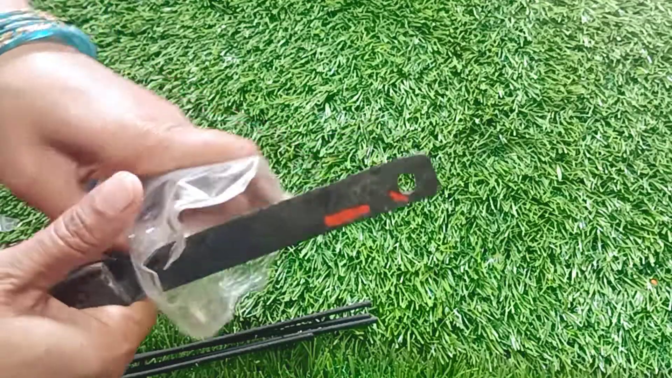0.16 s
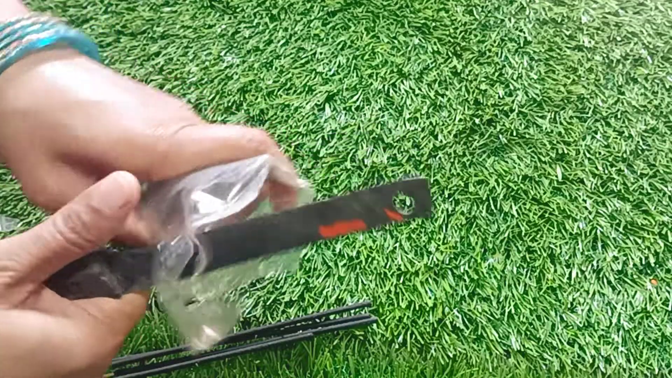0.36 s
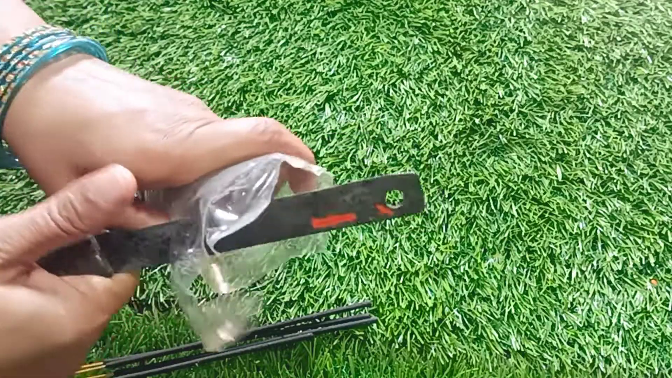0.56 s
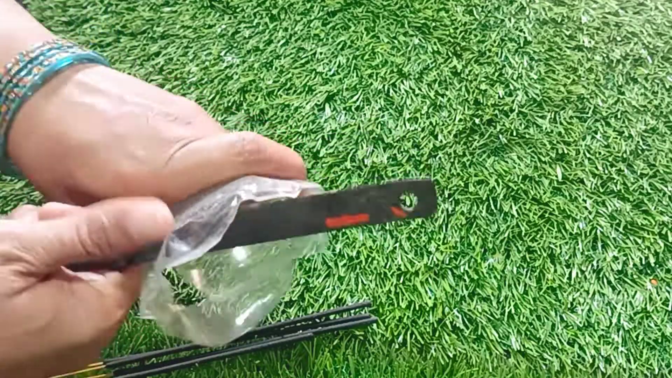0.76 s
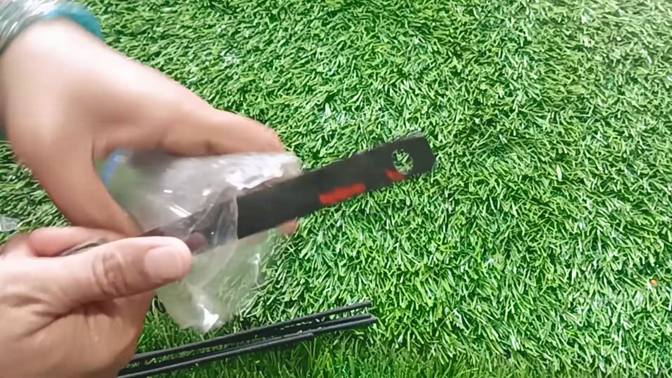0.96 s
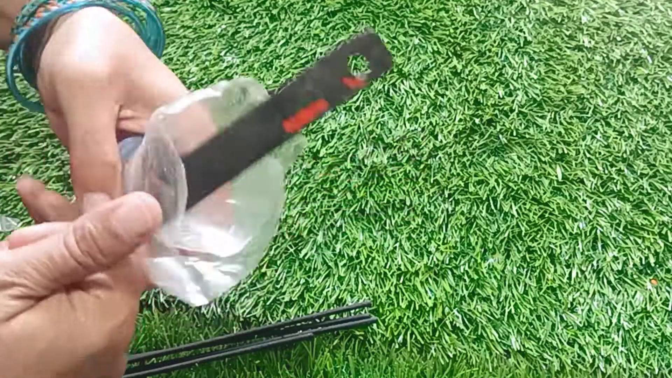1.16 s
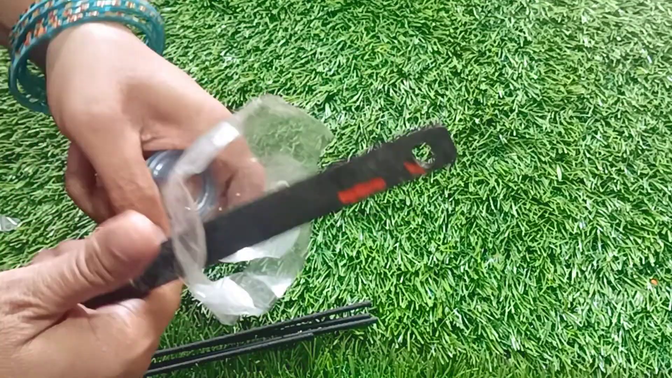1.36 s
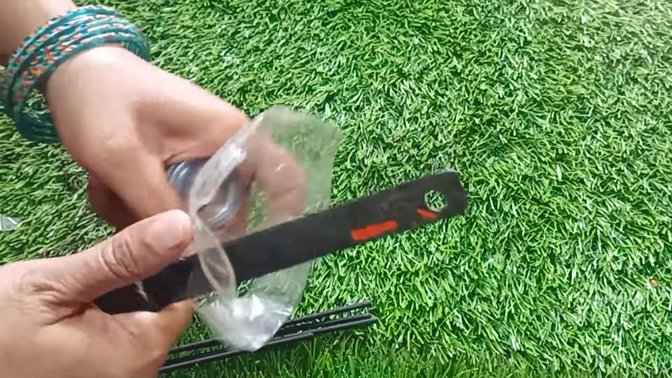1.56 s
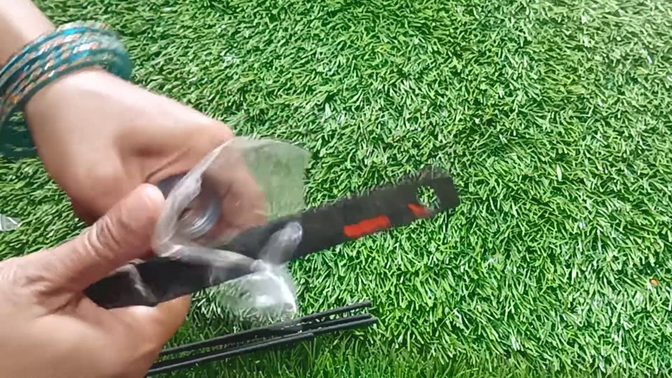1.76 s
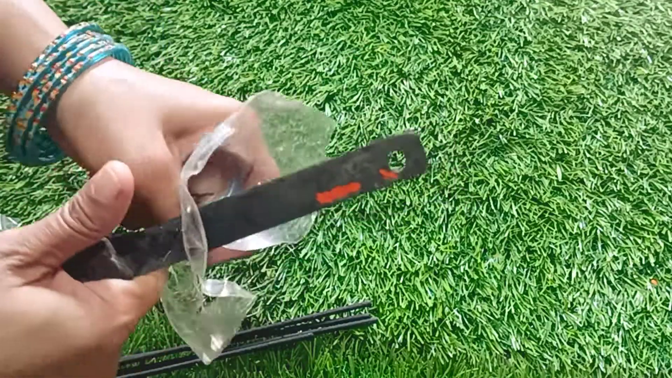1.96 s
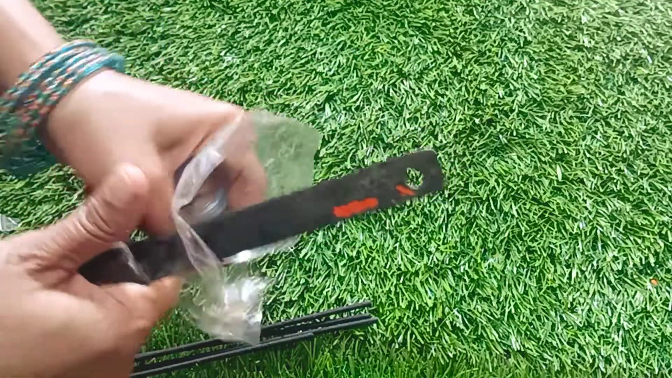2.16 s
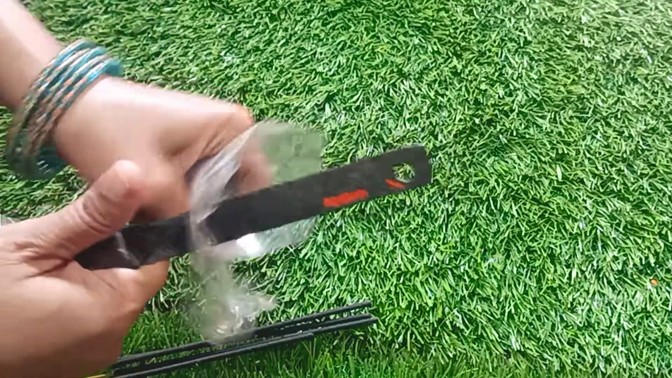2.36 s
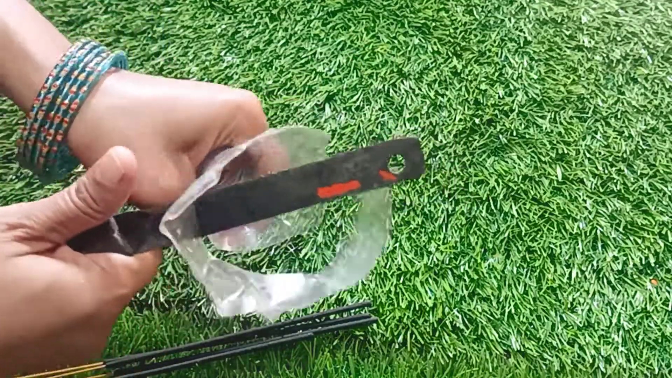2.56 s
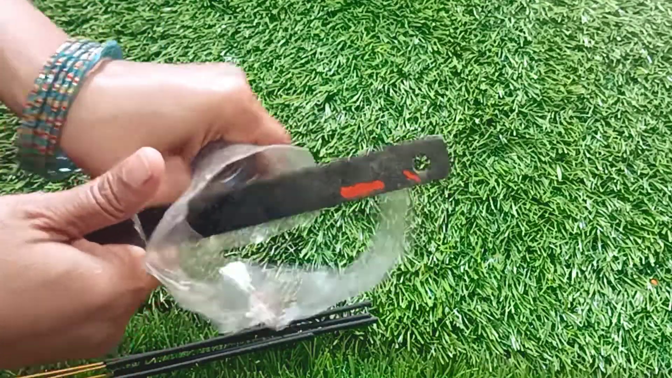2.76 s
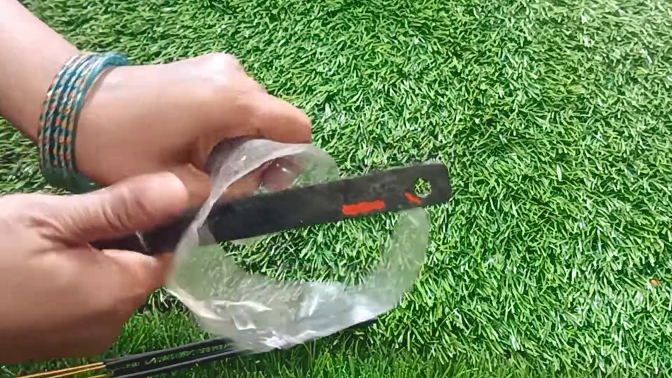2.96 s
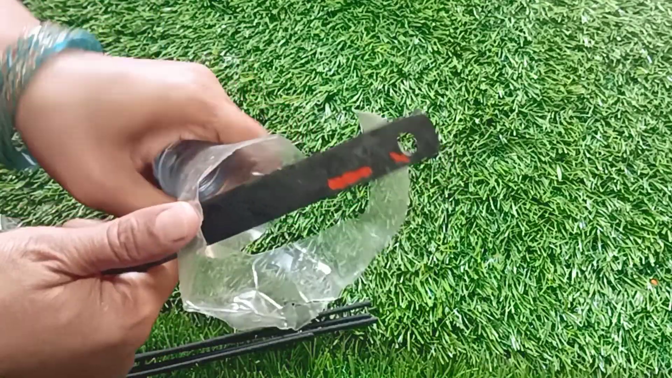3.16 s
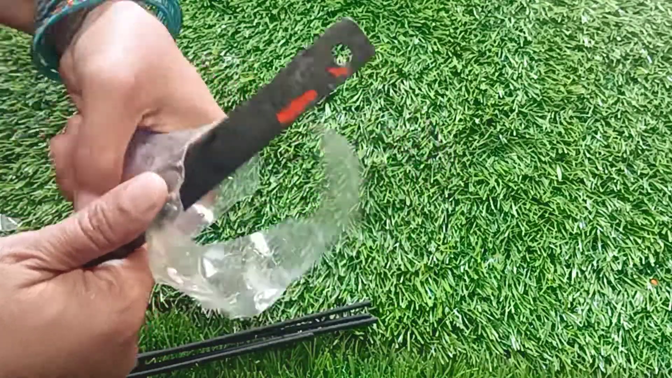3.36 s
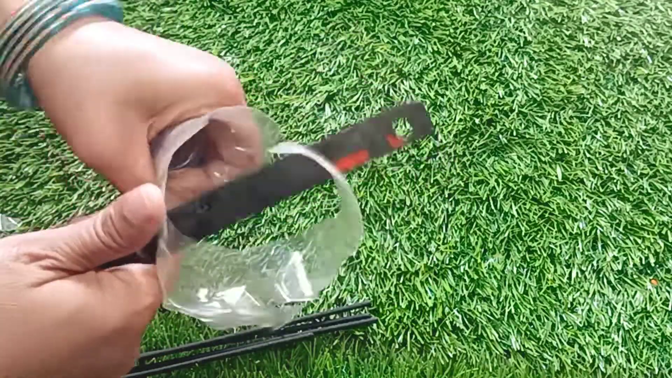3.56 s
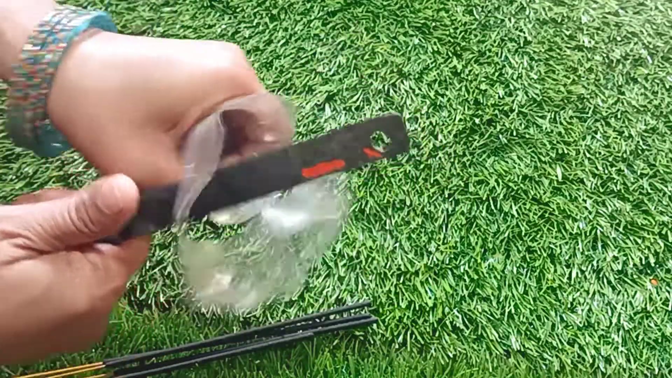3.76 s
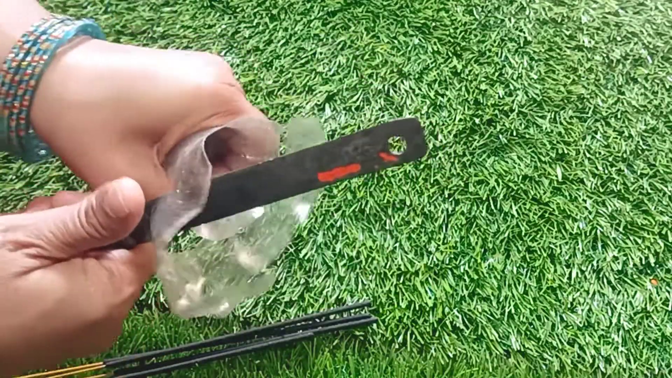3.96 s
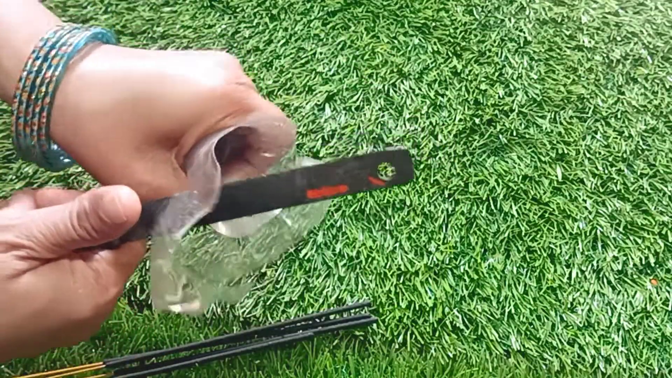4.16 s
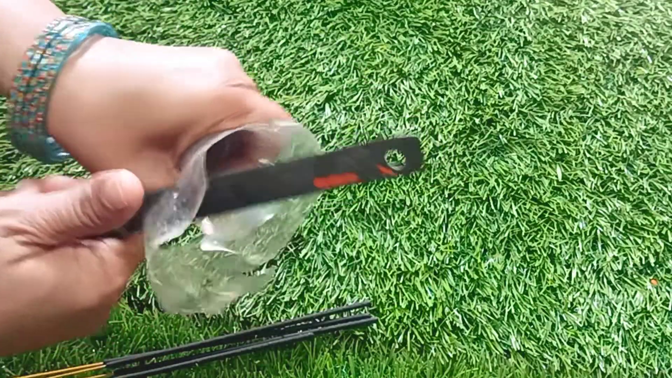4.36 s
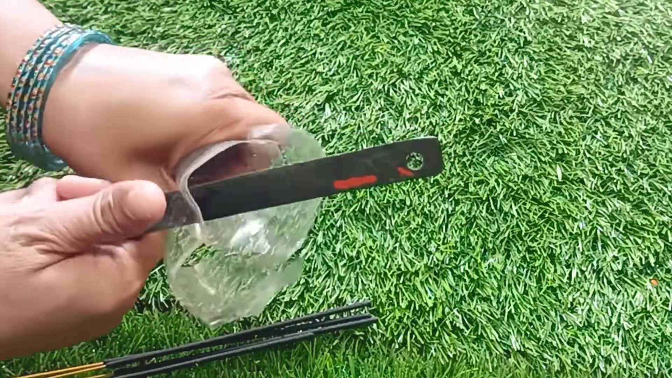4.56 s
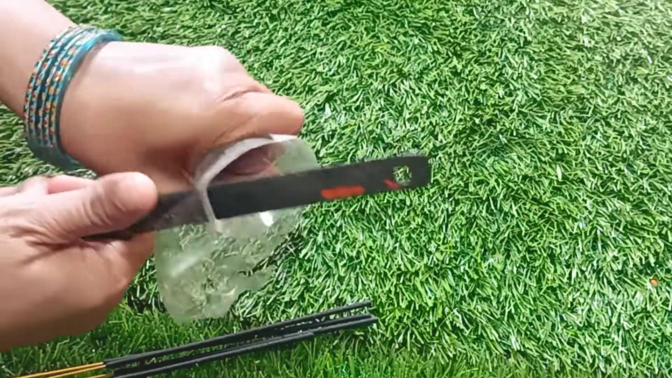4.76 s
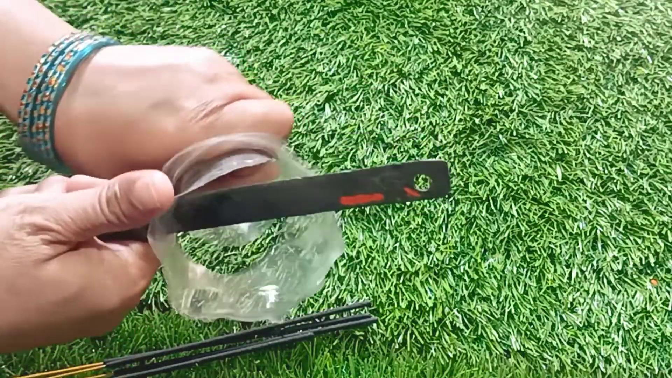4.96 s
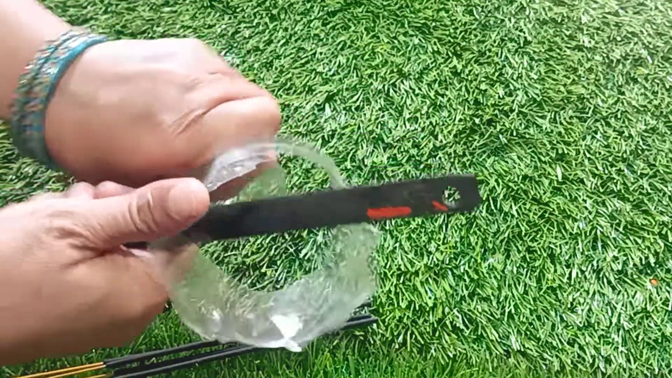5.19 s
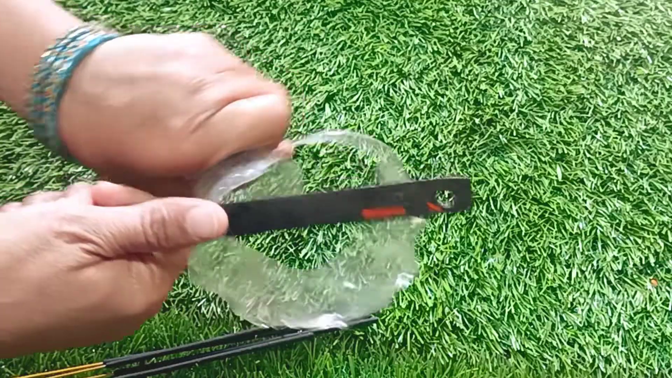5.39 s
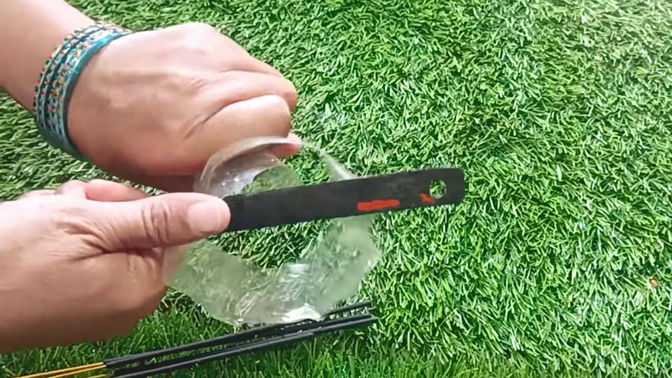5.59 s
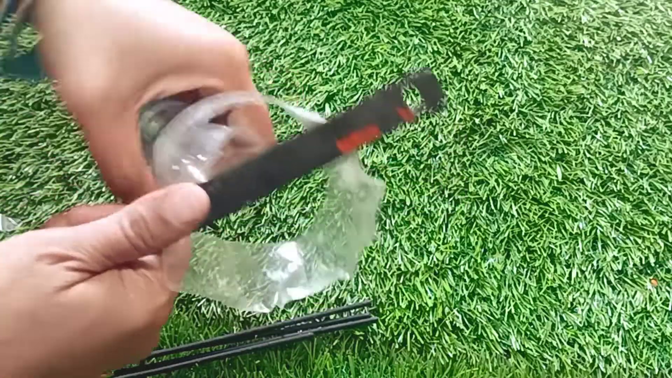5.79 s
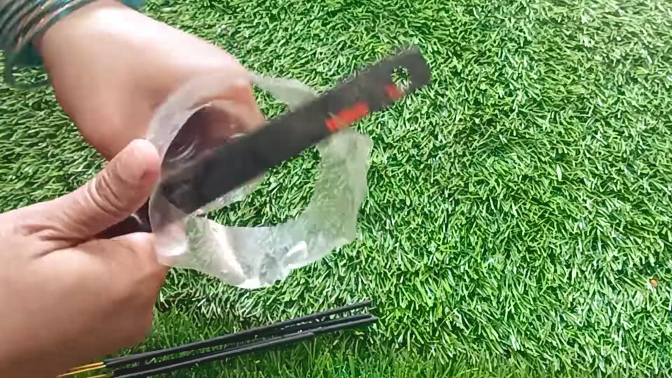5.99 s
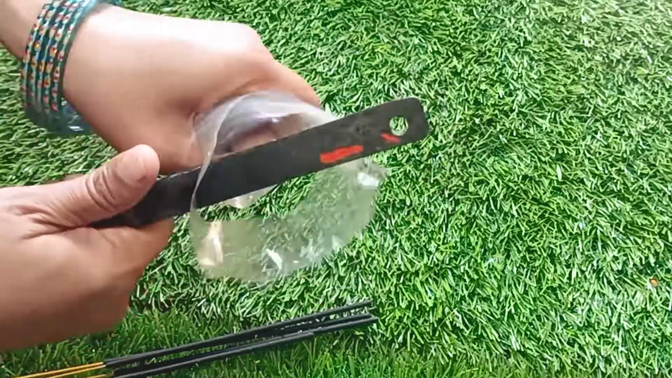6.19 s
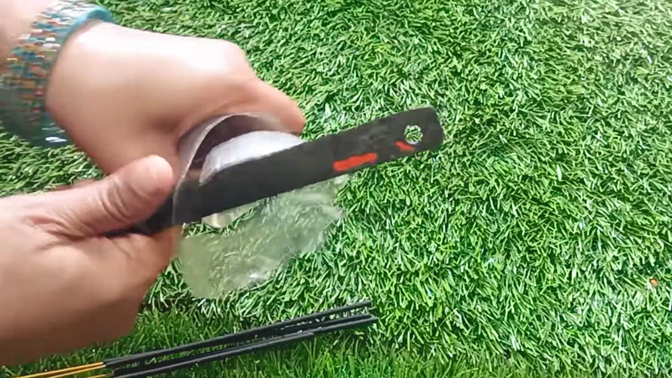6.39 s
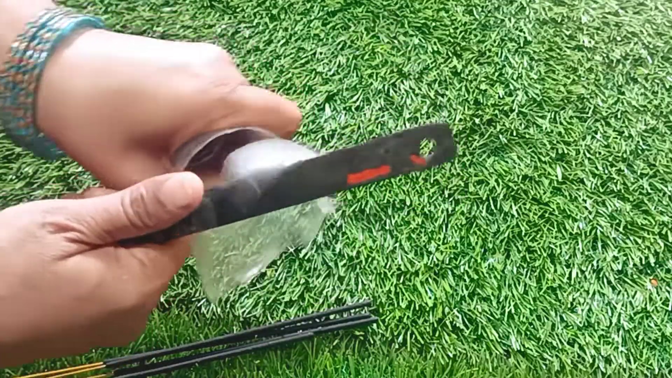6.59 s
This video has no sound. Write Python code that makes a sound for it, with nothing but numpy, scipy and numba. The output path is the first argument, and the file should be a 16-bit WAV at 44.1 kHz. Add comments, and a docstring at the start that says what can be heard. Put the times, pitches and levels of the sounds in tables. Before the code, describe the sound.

A small saw blade rasps back and forth through a thin plastic bottle wall, scratchy crackling strokes with sharp snaps and quieter gaps.

```python
"""A dense crackle swells and dies in strokes: a saw blade works back and forth through a thin plastic bottle wall.
Its teeth catch and slip; louder snaps come as the wall buckles or a tooth tears free. Both ring the same wall modes.
Late on, the cut edge gives a short run of squeaks: noise through one narrow, wavering mode.
Glass bangles chink faintly as decaying sines. Behind lie a short noise-tail reverb, a low hush and a faint rumble."""
import sys
import numpy as np
from scipy import signal
from scipy.fft import rfft, irfft
from scipy.io import wavfile
from scipy.ndimage import uniform_filter1d
from numba import njit

SR = 44100
rng = np.random.default_rng(int(sys.argv[2]) if len(sys.argv) > 2 else 0)


def file_out(sig):
    """Save sig as 16-bit WAV at sys.argv[1]."""
    # one column per channel
    cols = np.atleast_2d(sig).T
    # limit, then scale
    lim = np.clip(cols, -1, 1)
    pcm = np.round(lim * 32767).astype(np.int16)
    wavfile.write(sys.argv[1], SR, pcm)


N = 292383


def undb(db):
    """Amplitude ratio of a level in dB."""
    return 10 ** (np.asarray(db) / 20)


def rms(x):
    """Root mean square level."""
    return np.sqrt(np.mean(x ** 2))


def band(x, edges_hz):
    """Second-order Butterworth band-pass."""
    return signal.sosfilt(signal.butter(2, edges_hz, "band", fs=SR, output="sos"), x)


def walk(rate_hz):
    """Random levels held 1 / rate_hz s and smoothed twice; spread near 1."""
    hold = int(SR / rate_hz)
    steps = np.repeat(rng.standard_normal(N // hold + 1), hold)
    smooth = uniform_filter1d(uniform_filter1d(steps, hold), hold)
    return 1.414 * smooth[:N]


@njit
def ring(x, pole):
    """One decaying mode whose complex pole may change every sample."""
    y, z = np.empty(len(x)), 0j
    for i in range(len(x)):
        z = z * pole[i] + x[i] + 1e-18
        y[i] = z.imag
    return y


def pole_of(hz, t60_s):
    """Pole of a mode with that pitch and 60 dB decay time."""
    return np.exp(2j * np.pi * hz / SR - np.log(1000) / (t60_s * SR))


# Modes of the plastic wall, in four groups from body to top. Each row: pitch in Hz, relative level in dB,
# nominal t60 in s (wall() scales it).
BODY_MODES = [(158, -24, 0.069), (242.4, -18.5, 0.043), (302.3, -15, 0.024), (421, -1.5, 0.068),
              (502, -1, 0.033), (602.3, 4, 0.089), (766, 16, 0.034), (876, 13, 0.026)]
WALL_MODES = [(1330, -16.5, 0.068), (1472, -3.5, 0.069), (1595, -6.5, 0.09), (1751, -4.5, 0.065),
              (1902, 3.5, 0.036), (2073.5, -0.5, 0.038), (2156, -8, 0.065), (2436, 1.5, 0.019),
              (2694, 6.5, 0.014), (3095, -6.5, 0.044), (3230, -26.5, 0.0092)]
TREBLE_MODES = [(3350, -3.5, 0.0033), (4080, -1.5, 0.0063), (4830, -6, 0.02), (5610, -3.5, 0.0056),
                (5926, -5, 0.017), (6666, -5.5, 0.018), (7150, -9, 0.013)]
TOP_MODES = [(9000, 8, 0.0062), (8920, 1, 0.014), (9900, 5.5, 0.0078), (10900, -12.5, 0.0033),
             (12800, -18, .003), (15100, 2, .004)]
# Bands radiated by the wall, body, treble and top modes, in that order. Each row: low edge in Hz, high edge in Hz.
RADIATED_BANDS = [(946, 3180), (151, 940), (3300, 6980), (7240, 21000)]


def wall(modes, edges_hz, at, size, scatter_db, bend, t60_scale=1.1):
    """Blows ring a group of modes: each lands elsewhere, and the changing grip shifts mode levels and pitches."""
    place = rng.standard_normal((len(at), len(modes) + 1))
    polarity = np.sign(place[:, -1])
    out = 0
    for k, (hz, db, t60_s) in enumerate(modes):
        blows = size * polarity * undb(db + scatter_db * place[:, k])
        push = np.bincount(at, blows, N) * undb(1.37 * walk(8))
        pitch_hz = hz * (1 + bend * walk(30))
        out = out + ring(push, pole_of(pitch_hz, t60_s * t60_scale))
    return band(out, edges_hz) / np.sum(undb(np.array(modes)[:, 1]))


RASP_TOP_DB = -15  # highest level of the rasp in dB, before its shares
SLIPS_PER_S = 2200
TEETH_PER_S, TOOTH_FADE_DB = 100, 4.5  # the tooth rate wanders around this
# Blade strokes and lighter rubs between them. Each row: time of full level in s, hold in s, level in dB before
# the RASP_TOP_DB cap, rise in dB per s, nominal fall in dB per s, then relative shares in dB of rumble, low body,
# body, upper wall, treble, top and hollow ring, last the hollow ring pitch in Hz.
BLADE_STROKES = [(0.003, 0.0037, -14, 3060.0, 310, -33, -24, -13, -8, -19, -34.5, -15, 732),
                 (0.169, 0.036, -24.5, 820.0, 328, -48, -16, -12.5, -12, -19.5, -34, -16, 785),
                 (0.303, 0.034, -20.5, 293, 380.0, -57, -26, -12, -15, -20, -35.5, -19, 240),
                 (0.423, 0.056, -23.5, 1960.0, 271.5, -48, -30.5, -17.5, -28, -21.5, -40.5, -23, 759),
                 (0.565, 0.052, -22, 390.0, 260.0, -45, -19.5, -10.5, -18, -16, -33, -10, 580),
                 (0.694, 0, -22, 616, 130.0, -45, -28.5, -19, -12, -17, -37, -16, 752),
                 (0.84, 0.012, -27.5, 150.0, 201, -29.5, -27, -10, -6.5, -16.5, -37.5, -15, 558),
                 (0.954, 0.002, -41.5, 510.0, 512, -45, -37, -10, -1, -14, -35, -18, 740),
                 (0.999, 0.012, -42.5, 632, 450.0, -36, -36, -13.5, -2, -3.5, -39, -11, 861),
                 (1.063, 0.0, -47.5, 570.0, 220.0, -37, -32, -12, -7, -17, -31, -23, 415),
                 (1.1, 0.029, -61.5, 400, 400, -16, -20, 4, -14, -19, -30, 4, 430),
                 (1.179, 0, -47.5, 1734, 342, -35, -31, -17, 0, -23, -15, -20, 762),
                 (1.208, 0.03, -65.5, 500, 300, -26, -20, 5, -8, -21, -31, 3, 600),
                 (1.248, 0.047, -49, 968, 1040.0, -35, -28, -22, -12, -33, -41, -15, 614),
                 (1.317, 0.041, -41.5, 2673, 710.0, -44, -36, -17, -5.5, -11, -28, -32, 849),
                 (1.429, 0, -42.5, 404, 612, -39, -28, -18, -18, -28, -41, -26, 845),
                 (1.487, 0, -39.5, 4004, 869, -35, -31, -13.5, -14, -26, -41, -13, 767),
                 (1.576, 0.0073, -50, 1911, 710.0, -30, -13, -13, -19, -26, -45, -25, 326),
                 (1.637, 0.038, -26.5, 3721, 400.0, -54, -28, -27, -14, -15, -32, -26, 626),
                 (1.75, 0.031, -44, 288, 163.5, -32, -27, -15, -17, -14, -35, -20, 748),
                 (1.83, 0.03, -23.5, 2732, 560.0, -59, -44, -28, -8.5, -22, -35, -20, 675),
                 (1.934, 0.011, -38, 1422, 630.0, -32, -26, -36, -3.5, -19, -37, -39, 830),
                 (2.032, 0, -23.5, 564, 375, -41, -20, -11, -9, -27, -37, -20, 777),
                 (2.11, 0.03, -56.5, 500, 392, -36, -12, -1, 1, -26, -32, 1, 415),
                 (2.159, 0.011, -16.5, 2030.0, 399, -64, -32, -16, -14.5, -26.5, -34.5, -18.5, 759),
                 (2.298, 0.051, -21, 417, 389, -26.5, -12, -10.5, -12.5, -16, -30, -22, 785),
                 (2.464, 0.0, -19.5, 368, 250.0, -40, -24, -7, -5, -16.5, -28, -23, 817),
                 (2.583, 0.064, -28, 1240.0, 337, -38, -15.5, -12.5, -4, -12.5, -23, -17.5, 750),
                 (2.72, 0.053, -31.5, 630.0, 235, -44, -21, -14.5, -8, -10, -26.5, -16.5, 527),
                 (2.865, 0.0, -22.5, 1040.0, 214, -40, -8.5, -2.5, -4, -14, -27, -18, 727),
                 (2.96, 0, -29, 3996, 705, -52, -19.5, -9, -9, -11, -13, -8.5, 420),
                 (3.003, 0.018, -48, 1130.0, 420.0, -58, -33, -15, -3, -4, -17, -22, 450),
                 (3.074, 0.0018, -33, 1200.0, 433, -51, -20, 1.5, -16, -16, -20, 3, 484),
                 (3.11, 0.034, -35.5, 155, 345, -50, -25, -10, -4.5, -8, -24.5, -17.5, 488),
                 (3.334, 0, -39.5, 420.0, 520.5, -38, -25, -22, -8, -12, -33, -21, 924),
                 (3.458, 0.038, -55, 223, 631, -27, -24.5, -18, -7, -23, -35, -14, 803),
                 (3.542, 0.0076, -29.5, 3194, 249, -46, -29, -5, -4, -6, -20.5, -26, 760),
                 (3.698, 0.03, -55, 504, 300, -25, -4, 4, -7, -24, -35, 4, 463),
                 (3.782, 0.024, -28.5, 300.0, 450.0, -36, -5, -5, -12, -19.5, -30, -9.5, 386),
                 (3.833, 0.052, -21.5, 660.0, 417, -44, -19, -8.5, -13, -16.5, -29, -22, 748),
                 (3.973, 0.029, -22.5, 370.0, 406, -52, -19, -11.5, -12, -17, -32.5, -17, 790),
                 (4.098, 0.076, -33, 1350.0, 436, -46, -26, -12.5, -7.5, -13, -44, -45, 700),
                 (4.125, 0.043, -46, 900, 700, -40, -15, 2, -9, -25, -45, 2.5, 279),
                 (4.289, 0.065, -29.5, 540, 332, -43, -17, -3, -8.5, -12.5, -35, -10, 860),
                 (4.464, 0.018, -26.5, 510.0, 227, -49, -20, -5.5, 1, -8.5, -44, -20.5, 840),
                 (4.608, 0.0035, -26, 362, 457, -49, -11.5, -6.5, -6, -12, -32, -11, 624),
                 (4.756, 0.0098, -29.5, 670.0, 575.5, -41, -18, -7, -3.5, -14.5, -27, -17, 770),
                 (4.898, 0.014, -31, 2695, 670.0, -46, -20, -6.5, -11, -16.5, -33, -8.5, 740),
                 (4.94, 0.0016, -28.5, 3663, 350.0, -43, -30, -6, -7, -8.5, -31.5, -17, 734),
                 (5.062, 0, -31.5, 154, 509, -31, -28, -8, 0.5, -9, -44, -11, 548),
                 (5.2, 0, -26, 760.0, 226, -43, -24.5, -5, -3.5, -12, -21, -15, 920),
                 (5.314, 0.031, -30.5, 940.0, 198, -39, -16, -4, -3.5, -12.5, -27, -13.5, 763),
                 (5.494, 0.0, -27.5, 578, 256, -51, -26.5, -9.5, -4, -9, -29, -18.5, 765),
                 (5.611, 0, -41.5, 207, 690.0, -44, -23, -10, -7, -18, -49, -24, 857),
                 (5.7, 0.026, -52.5, 150.0, 156, -32, -25, -12, -11, -19, -36, -23, 328),
                 (5.811, 0.082, -62.5, 201, 581, -11, -10, -6, -1.5, -6, -21, -18, 529),
                 (5.95, 0.11, -65, 183, 80.0, -14, -14, -12, -2.5, -12, -27, -17, 468),
                 (6.083, 0, -50, 646, 142, -21, -28, -14, -16, -26, -24, -24.5, 560),
                 (6.246, 0.029, -24.5, 529, 368, -36, -23, -4.5, -4, -11, -17, -17, 816),
                 (6.376, 0.00041, -24, 520.0, 410.0, -43, -16.5, -7, -1.5, -11.5, -23, -20, 880),
                 (6.502, 0.023, -33, 1910.0, 183, -22, -18, -11, -2, -9, -22, -18, 748)]


def pressure(share_db, linger):
    """Gain of all strokes, power-summed; a layer that lingers dies away more slowly."""
    t = np.arange(0, N, 32)[:, None] / SR
    s, hold_s, level_db, rise, fall = np.transpose(BLADE_STROKES)[:5]
    rise_db = rise * np.clip(s - t, 0, 1)
    fall_db = fall / linger * np.clip(t - s - hold_s, 0, 1)
    db = np.minimum(level_db, RASP_TOP_DB) + share_db - rise_db - fall_db
    gain = np.sqrt(np.sum(undb(db) ** 2, axis=1))
    return np.interp(np.arange(N) / SR, t[:, 0], gain)


def rasp():
    """Uneven stick-slip, strongest as each tooth bites, rings the wall; the open bottle end adds a hollow ring."""
    s, *_, low_db, body_db, upper_db, treble_db, top_db, hollow_db, hollow_hz = np.transpose(BLADE_STROKES)
    chance = rng.random((int(SLIPS_PER_S * N / SR), 3))
    at = (chance[:, 0] * N).astype(int)
    tooth = np.cumsum(TEETH_PER_S * np.exp(.3 * walk(40)) / SR) % 1
    slip_db = np.minimum(-3.3 * np.log(1 - chance[:, 1]), 13)
    size = undb(slip_db + 2.11 * walk(150)[at] - TOOTH_FADE_DB * tooth[at])

    def struck(modes, edges_hz):
        return wall(modes, edges_hz, at, size, 4.6, .06)

    wall_hz, body_hz, treble_hz, top_hz = RADIATED_BANDS
    # each new stroke sets the hollow pitch, 25 ms before its full level
    stroke = np.clip(np.searchsorted(s - .025, np.arange(N) / SR) - 1, 0, None)
    hollow_push = np.bincount(at, size * np.sign(chance[:, 2] - .5), N)
    hollow = ring(hollow_push, pole_of(hollow_hz[stroke], 0.09))
    layers = [  # sound, share dB, linger
        (struck(BODY_MODES[:3], body_hz), low_db - 3.5, 1.05),
        (struck(BODY_MODES[3:], body_hz), body_db - 5, 1.05),
        (struck(WALL_MODES[:7], wall_hz), -5.5, 1.01),
        (struck(WALL_MODES[7:], wall_hz), upper_db - 3.0, 1.01),
        (struck(TREBLE_MODES, treble_hz), treble_db - 0.5, 1.05),
        (struck(TOP_MODES, top_hz), top_db - 3, .9),
        (hollow, hollow_db, 1.05)]
    return sum(slips / rms(slips) * pressure(share_db, linger) for slips, share_db, linger in layers)


TEAR_S = .009
# The wall buckles or a tooth tears free. Each row: start in s, nominal peak in dB, panel ring pitch in Hz,
# then relative shares in dB of body, treble and panel ring.
WALL_SNAPS = [(0.0546, -20.5, 1780, -15, -27, 3), (0.1448, -23, 2140, -16, -23, -1),
              (0.165, -14, 1800, -13, -27.5, -2), (0.195, -10.5, 1950, -22, -20, 3.5),
              (0.2797, -15, 2220, -27, -24, -6), (0.286, -23, 1740, -33, -23, 1.5),
              (0.2926, -13, 1630, -29, -20, -5), (0.3141, -10.5, 1530, -19.5, -15, 3.5),
              (0.3342, -8, 1456, -28, -26.5, -4.5), (0.4238, -25.5, 1470, -19, -35, 5),
              (0.4344, -14.5, 1960, -33, -24, -1), (0.4693, -3.5, 1760, -24, -22, 0),
              (0.5502, -22, 1770, -4, -17.5, -1), (0.5744, -8.5, 1470, -12.5, -18, -4),
              (0.5778, -8, 1680, -13, -27, 2), (0.5957, -13, 1640, -12.5, -14, 0),
              (0.6097, -8.5, 1610, -17, -20, -7), (0.6224, -12, 2100, -19, -13.5, -8),
              (0.69, -23, 1640, -8.5, -23, -1), (0.697, -19, 1670, -12, -16.5, -1),
              (0.7267, -6.5, 2000, -48, -29, 1), (0.809, -22.5, 2650, -9, -12, -1),
              (0.8255, -14.5, 2120, -15.5, -15, -3), (0.837, -9, 1530, -29, -20, -4),
              (0.8442, -12.5, 2030, -22, -22, 2), (0.8691, -19, 1860, -32, -24, -8),
              (0.9525, -14, 1720, -32, -11, -4), (1.009, -29, 1820, -29, -6, -10),
              (1.0674, -30.5, 2040, -40, -9.5, 0.5), (1.178, -32, 2400, -44, -1.5, 2.5),
              (1.3119, -28, 1900, -30, -11, 0.5), (1.3229, -34.5, 2140, -27, -3, 1),
              (1.3509, -33, 2270, -30, 2, 7), (1.485, -25.5, 762, -26, -22, -4),
              (1.5775, -43.5, 1830, -17, -23, 6), (1.6386, -21.5, 1900, -45, -14, -3),
              (1.6606, -16, 1970, -18.5, -4, -0.5), (1.6712, -10, 2000, -14.5, -16, 0.5),
              (1.6864, -18.5, 1860, -13, -31, -2), (1.7493, -25.5, 1830, -30, -14, 2),
              (1.8267, -15.5, 2090, -48, -25, -12), (1.8392, -20, 1990, -37, -26, 2),
              (1.8539, -11, 1960, -24, -26, -4), (1.927, -30, 1740, -41, -32, -5),
              (1.9925, -16, 1790, -8.5, -16.5, 1), (2.017, -12.5, 1810, -15, -18.5, 0.5),
              (2.0234, -12.5, 1480, -14, -17, 0.5), (2.0461, -14, 1850, -21, -18, 2.5),
              (2.1544, -24, 1930, -22, -37, -4), (2.1666, -4.5, 1720, -31, -27, -9),
              (2.2518, -26, 1580, -29, -33, 2), (2.2862, -5.5, 1920, -20, -12, -4),
              (2.3037, -10.5, 1470, -13.5, -21, -2), (2.3117, -14, 1860, -19.5, -8.5, -2),
              (2.3211, -10, 1750, -26, -15, -6.5), (2.3306, -7, 1790, -25, -13, 0.5),
              (2.4455, -20, 813, -3, -22, 2.5), (2.4507, -17.5, 1540, -8, -23, -4),
              (2.4651, -13, 1450, -14, -14, 1.5), (2.4705, -14, 1540, -20, -8, -8.5),
              (2.5023, -11, 1690, -11.5, -8.5, -4.5), (2.576, -12.5, 1210, -9.5, -12.5, -6.5),
              (2.603, -5, 1990, -18, -10, -5.5), (2.6348, -8, 1485, -10.5, -16.5, -7),
              (2.7057, -18.5, 1880, -5, -33, -3), (2.7171, -11.5, 1560, -9, -15.5, -4.5),
              (2.7422, -19, 1690, -17, -14, -5), (2.7605, -6, 1730, -21, -26, -1.5),
              (2.8527, -20.5, 1840, -14, -17, -3), (2.8639, -6.5, 1470, -11, -20, -9),
              (2.9128, -15.5, 1830, -11.5, -16, 5), (2.9603, -15, 1670, -28, -1.5, -5.5),
              (3.0025, -16, 2930, -29, 0.5, 2.5), (3.066, -16, 1760, -14, -23, 3),
              (3.0806, -9, 2400, -14.5, -11, -3), (3.3528, -33, 1180, -27, -31, -3.5),
              (3.4858, -40.5, 1890, -13, -29, -4), (3.5394, -5.5, 1750, -16, -10, -9.5),
              (3.5646, -24.5, 1800, -24, -2, -8), (3.721, -31.5, 1920, -8, -31, -2),
              (3.7585, -17.5, 1940, -18.5, -7, -9), (3.7868, -15.5, 1810, -10, -14.5, -2),
              (3.8247, -12.5, 1940, -15, -18, -5), (3.8374, -14, 1860, -34, -9.5, -5),
              (3.8442, -8, 1920, -20, -12.5, -10), (3.8671, -4, 1860, -28, -13.5, -7),
              (3.9489, -17, 1480, -16, -29, 0), (3.9704, -18, 1570, -8.5, -34, 4),
              (3.9834, -8.5, 1960, -19, -32, -7), (4.002, -16.5, 2000, -25, -16, -2),
              (4.0901, -22.5, 1880, -45, -9.5, -2), (4.1485, -17, 2020, -26, -23, -1.5),
              (4.2835, -4, 1660, -17.5, -15.5, -4), (4.2915, -7.5, 1490, -16, -24, -3),
              (4.3074, -14.5, 1910, -15, -20, -3), (4.3297, -10.5, 2090, -24, -9, -8),
              (4.339, -13.5, 2750, -27, -4.5, -1), (4.4351, -16.5, 2020, -15, -11.5, -7),
              (4.4504, -17, 1920, -19, -9, 1), (4.4622, -12.5, 2670, -23, -5.5, -4),
              (4.4732, -16.5, 1860, -22, -15, -3), (4.4823, -10.5, 2000, -27, -12, -4.5),
              (4.4887, -17, 1990, -18, -14, -2), (4.515, -20.5, 2610, -10, -12, -11),
              (4.592, -19, 1470, -9, -21, -4), (4.611, -13, 1470, -14, -23, 0),
              (4.744, -17.5, 1910, -9, -14, -7), (4.7647, -21.5, 1610, -7, -28, -7),
              (4.7846, -18.5, 2070, -10.5, -22, -3.5), (4.8992, -8.5, 2110, -17, -18.5, -2.5),
              (4.9402, -10.5, 732, -23, -4.5, -8), (5.012, -24, 2180, -33, -8, -1),
              (5.0541, -20, 2760, -12.5, -2.5, -3), (5.0621, -24, 1710, -10, -14, -7),
              (5.0801, -23, 1620, -19, -20, -8), (5.162, -35, 1780, -3, -23, 1),
              (5.1941, -20.5, 1860, -11, -8, -2), (5.2679, -39, 1890, -25, -21, -10),
              (5.3079, -17, 2560, -2.5, -8, 4), (5.3421, -22.5, 2100, -9, -3, -4),
              (5.4918, -4.5, 1990, -39.5, -36, -10), (5.594, -25, 1990, -29, -31, -8),
              (5.6999, -42, 3290, -26, -14, -6), (5.8844, -44, 2370, -33, -2, 1),
              (6.1922, -35, 1820, -4, -19, 0.5), (6.2278, -17.5, 1870, -3.5, -20.5, -3),
              (6.2514, -21.5, 830, -13, -23, -3), (6.2622, -14, 2040, -17, -22, -4),
              (6.2811, -10, 2100, -30, -21.5, 0), (6.349, -20, 2130, -11, -17, 3),
              (6.3707, -9, 2000, -22.5, -32, -4), (6.5015, -14, 1460, -18.5, -20, -2.5)]


def snaps():
    """Each snap tears briefly: a first crack, quick weaker ones (more even in the treble), and a panel ring."""
    s, peak_db, hz, body_db, treble_db, panel_db = np.transpose(WALL_SNAPS)
    chance = rng.random((len(s), 12))
    after_s = TEAR_S * chance ** 1.5 * (np.arange(12) > 0)
    at = np.clip(((s[:, None] + after_s) * SR).astype(int), 0, N - 1).ravel()
    groups = [  # modes, share dB, later cracks dB, their fade dB per s
        (WALL_MODES, .6, -10, -1500),
        (BODY_MODES, body_db + 4.0, -10, -1500),
        (TREBLE_MODES, treble_db + 6.0, -4, -1200),
        (TOP_MODES, treble_db - 13.5, -4, -1200)]
    out = 0
    for (modes, share_db, later_db, fade), edges_hz in zip(groups, RADIATED_BANDS):
        crack_db = (peak_db + share_db)[:, None] + fade * after_s + later_db * (after_s > 0)
        out = out + wall(modes, edges_hz, at, undb(crack_db).ravel(), 4.31, 0.0594, t60_scale=0.69)
    first = at[::12]
    latest = np.clip(np.searchsorted(first, np.arange(N), "right") - 1, 0, None)
    panel_hz = hz[latest]
    panel_push = np.bincount(first, undb(peak_db + panel_db), N)
    panel = ring(panel_push, pole_of(panel_hz, 30 / panel_hz))  # t60 of 30 cycles
    return out + band(panel, (500, 5000))


# The cut edge squeaks along the blade. Each row: start in s, length in s, centre pitch in Hz, level in dB.
EDGE_SQUEAKS = [(5.519, 0.04, 3130, -42.5), (5.573, 0.036, 3430, -46.5), (5.639, 0.049, 3290, -51.5),
                (5.697, 0.024, 3320, -52)]


def squeaks():
    """Friction noise in one narrow, wavering mode."""
    out, t = 0, np.arange(N) / SR
    for s, length_s, hz, db in EDGE_SQUEAKS:
        pitch_hz = hz * (1 + .025 * walk(60))
        x = ring(rng.standard_normal(N), pole_of(pitch_hz, 0.017))
        fade = np.clip(np.minimum(t - s, s + length_s - t) / 0.0046, 0, 1)
        out = out + undb(db) * x / rms(x) * fade
    return out


# Bangles touch. Each row: start in s, pitch in Hz, level in dB, t60 in s.
BANGLE_CHINKS = [(1.133, 5400, -66, .077), (1.138, 9100, -72, .06), (1.278, 10250, -64, .07),
                 (1.28, 3800, -63, .089), (1.312, 11000, -63, .07), (1.312, 9700, -66, .07),
                 (3.29, 6200, -68, .15), (5.925, 10250, -65, .1), (5.926, 9040, -59, .05),
                 (5.93, 5330, -64, .15), (6.018, 11000, -58, .07), (6.02, 5800, -68, .12),
                 (6.035, 10169, -57, .073), (6.118, 6790, -61, .08), (6.12, 3900, -66, .12),
                 (6.175, 10150, -62.5, .08)]


def bangles():
    """Thin glass rings: one decaying sine a touch, with a soft start."""
    out = np.zeros(N)
    for s, hz, db, t60_s in BANGLE_CHINKS:
        start = int(s * SR)
        t = np.arange(N - start) / SR
        decay = np.exp(-np.log(1000) * t / t60_s)
        out[start:] += undb(db) * np.sin(2 * np.pi * hz * t) * decay * np.clip(t / 0.0009, 0, 1)
    return out


ROOM_DB, ROOM_T60_S = -10, 0.14


def room(x):
    """Diffuse reflections, as decaying noise, that build up over 6.1 ms and die quickly."""
    t = np.arange(SR // 2) / SR
    decay = np.exp(-np.log(1000) * t / ROOM_T60_S)
    tail = rng.standard_normal(len(t)) * decay * np.clip(t / 0.0061, 0, 1)
    return undb(ROOM_DB) * signal.fftconvolve(x, tail / np.sqrt(np.sum(tail ** 2)))[:N]


def rumble():
    """Low band noise that comes and goes, stronger while the hands work the blade."""
    x = band(rng.standard_normal(N), (48, 130))
    work = pressure(np.transpose(BLADE_STROKES)[5] - 2.5, 0.49)
    return (undb(-89.5) + work) * undb(2.5 * walk(7.3)) * x / rms(x)


HUSH_DB = -70
# Background noise spectrum. Each row: frequency in Hz, relative level in dB.
HUSH_SPECTRUM = [(24, -38), (40, 3), (124, -7), (354, -5), (467, 0.5), (1120, -7), (1850, 12.5),
                 (3740, -17), (5870, -26.5), (8130, -61), (16000, -34)]


def hush():
    """Room background: shaped noise that swells a little."""
    hz, db = np.transpose(HUSH_SPECTRUM)
    log_hz = np.log(np.fft.rfftfreq(N, 1 / SR) + 1)
    shape = undb(np.interp(log_hz, np.log(hz), db))
    x = irfft(rfft(rng.standard_normal(N)) * shape, N)
    return undb(HUSH_DB + 0.83 * walk(47)) * x / rms(x)


def scene():
    """Bottle, blade and bangles in a small room."""
    near = rasp() + snaps() + squeaks() + bangles()
    # a small thin wall radiates little bass
    near = signal.sosfilt(signal.butter(2, 160, "high", fs=SR, output="sos"), near)
    mid = near + room(near) + hush() + rumble()
    return np.array([mid, mid])


TOP_HZ = 16400


def record(mix):
    """Nearly mono: peaks are rounded and the top is cut."""
    treble = signal.sosfilt(signal.butter(8, 4500, "high", fs=SR, output="sos"), mix[0])
    side = undb(-38 + 9.5 * walk(25)) * np.roll(treble, 40)
    rounded = np.tanh(1.108 * (mix + np.array([side, -side]))) / 1.095
    return signal.sosfilt(signal.ellip(10, .2, 80, TOP_HZ, fs=SR, output="sos"), rounded)


dry = scene()
out = record(dry)
file_out(out)
```